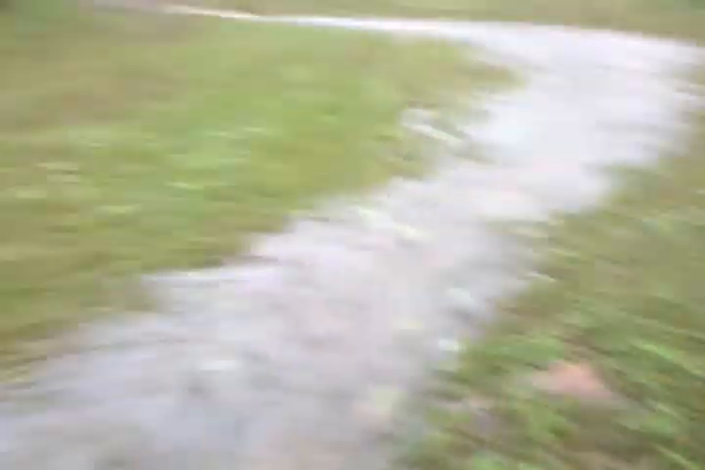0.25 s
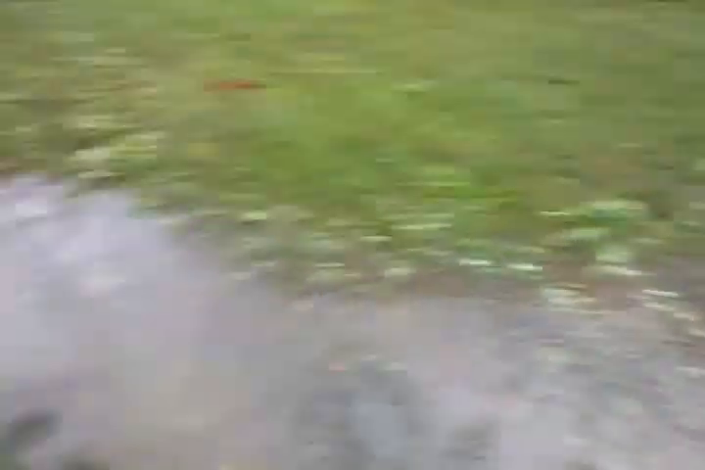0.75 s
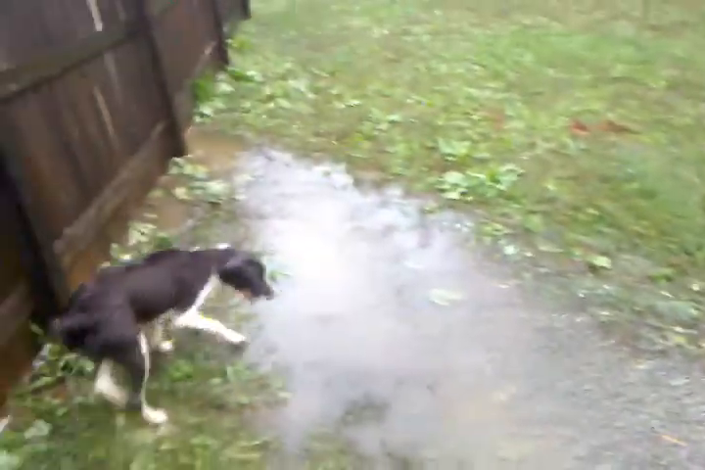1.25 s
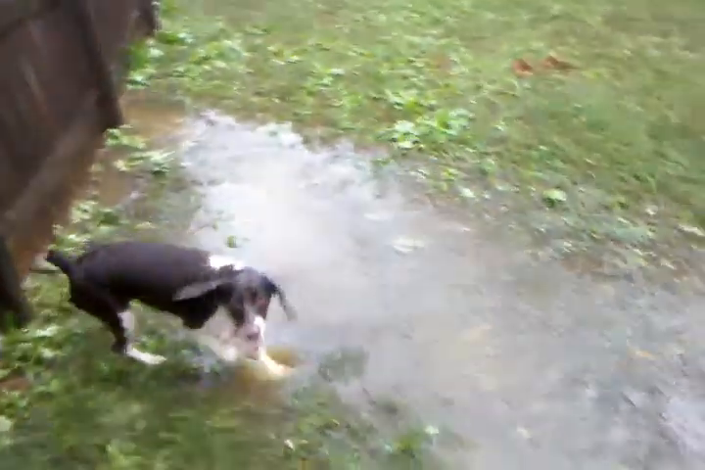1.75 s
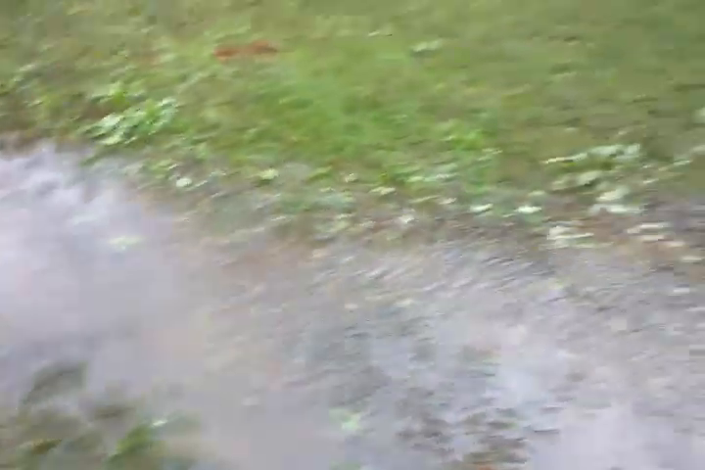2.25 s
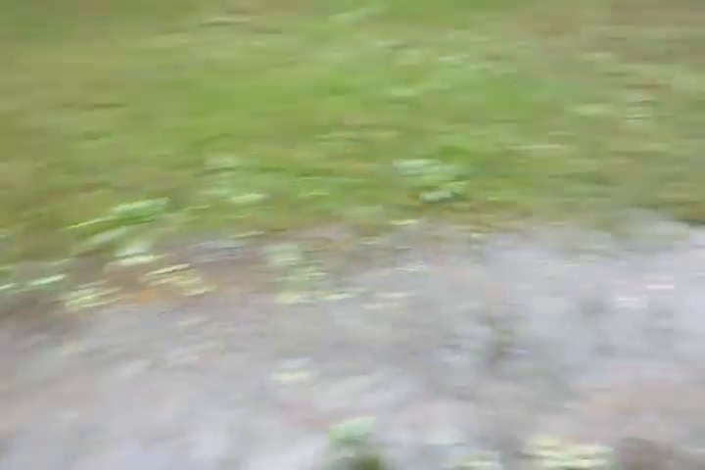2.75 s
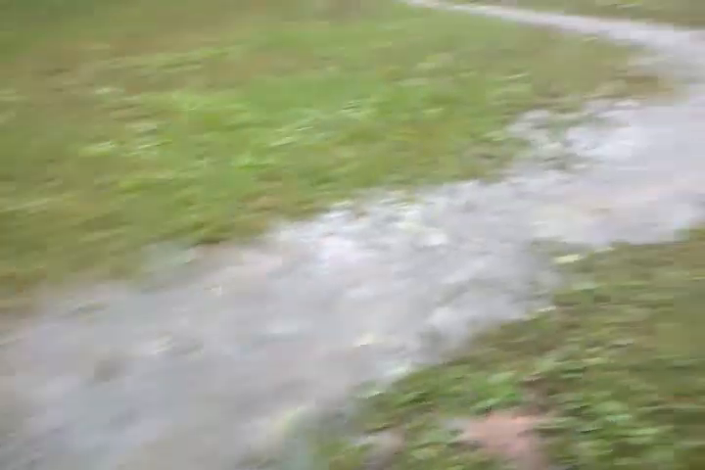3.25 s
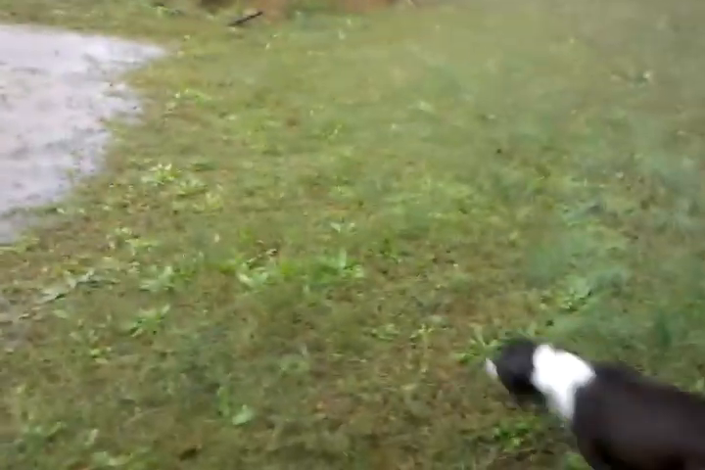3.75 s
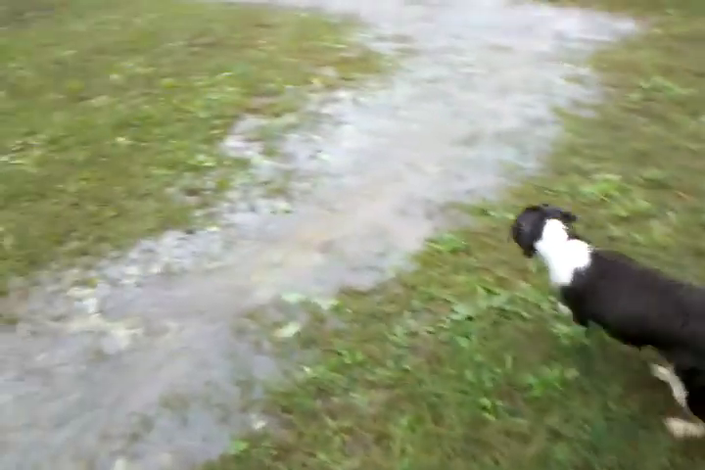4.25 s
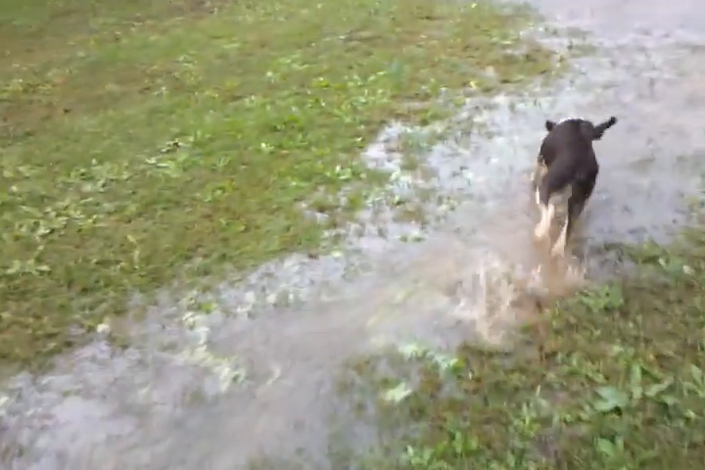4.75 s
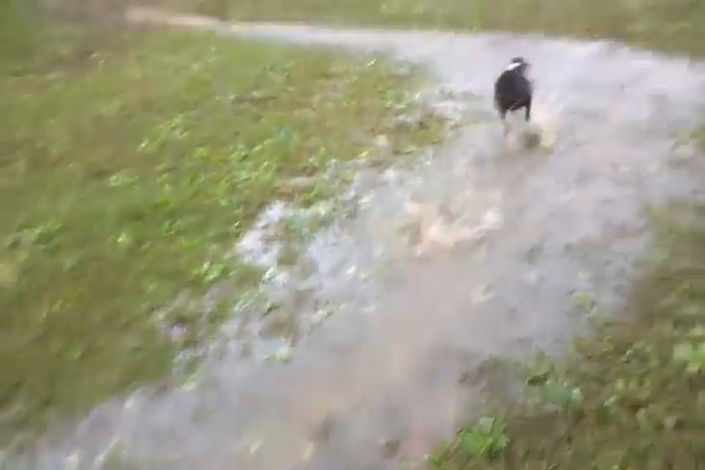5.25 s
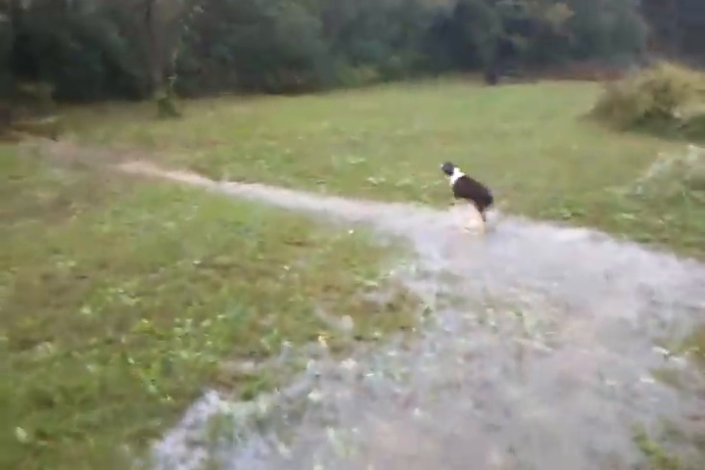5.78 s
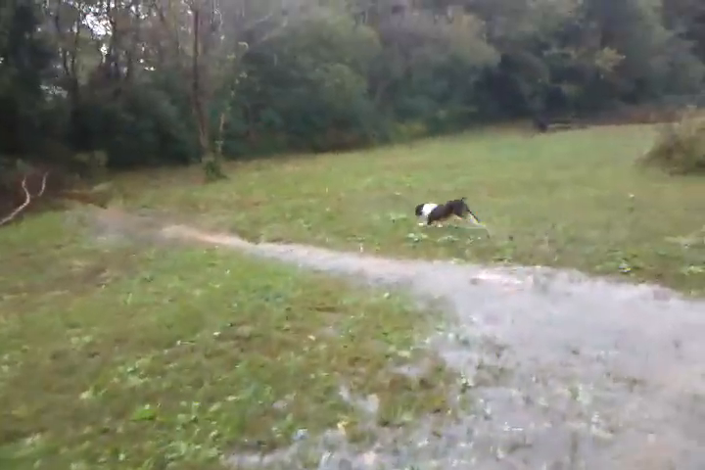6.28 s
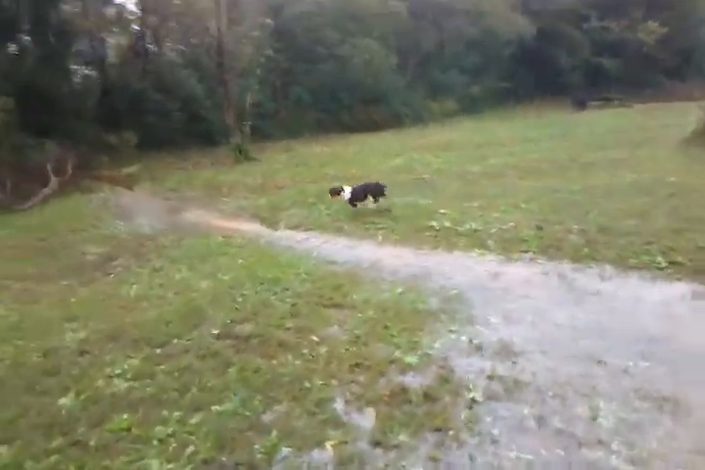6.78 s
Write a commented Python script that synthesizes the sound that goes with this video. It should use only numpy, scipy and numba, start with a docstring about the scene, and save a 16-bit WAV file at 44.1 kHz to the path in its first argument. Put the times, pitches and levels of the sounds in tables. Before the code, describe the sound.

Paws squelch and splash across a flooded lawn, loudest through a long puddle, with close drips and light steady rain.

```python
"""Dog splashing through rain

A dog crosses a flooded lawn, then runs off through a long puddle. Each step squeezes water out
of the turf as fine spray, small bubbles and deep gurgles; hard footfalls trap a ringing air pocket.
Single drops burst near the two ports of a hand-held phone, over rain hiss and a low outdoor rumble."""
import sys
import numpy as np
from scipy import signal
from scipy.fft import rfft, irfft
from scipy.io import wavfile
from scipy.ndimage import uniform_filter1d
from numba import njit

SR = 44100
rng = np.random.default_rng(int(sys.argv[2]) if len(sys.argv) > 2 else 0)


def wrap_up_sound(samples):
    """Save the sound to the file named by the first command line argument, as 16-bit audio."""
    columns = np.atleast_2d(samples).T
    # keep every value between -1 and 1, then stretch to whole-number steps
    tamed = np.clip(columns, -1, 1)
    steps = np.round(tamed * 32767).astype(np.int16)
    wavfile.write(sys.argv[1], SR, steps)


N = 309558
TIME = np.arange(N) / SR


def undb(db):
    """Decibels to gain."""
    return 10 ** (np.asarray(db) / 20)


def unit(x):
    """Scale to rms 1."""
    return x / np.sqrt(np.mean(x ** 2))


def colour(x, spectrum, size=4096):
    """Minimum-phase filter through (freq_hz, gain_db) points; attacks stay sharp."""
    hz, db = np.transpose(spectrum)
    grid_hz = np.arange(size // 2 + 1) * SR / size
    gain = undb(np.interp(np.log(grid_hz + 1), np.log(hz), db))
    cepstrum = irfft(np.log(gain))
    cepstrum[1:size // 2] *= 2
    cepstrum[size // 2 + 1:] = 0
    impulse = irfft(np.exp(rfft(cepstrum)))
    return signal.fftconvolve(x, impulse[None], axes=1)[:, :x.shape[1]]


def resonate(x, hz, q):
    """One resonance, scaled to rms 1."""
    return unit(signal.lfilter(*signal.iirpeak(min(hz, .4 * SR), q, fs=SR), x))


def pan(left_minus_right_db):
    """Constant-power left and right gains."""
    return unit(undb(np.array([[left_minus_right_db], [-left_minus_right_db]]) / 2))


def add(out, start_s, sound):
    """Mix a sound in at start_s."""
    i = max(int(start_s * SR), 0)
    out[:, i:i + sound.shape[1]] += sound[:, :N - i]


@njit
def ring_bubbles(start_s, hz, cycles, gain, glide):
    """Damped sines; each rises in pitch as its bubble nears the surface."""
    out = np.zeros(N)
    for k in range(len(start_s)):
        life_s = cycles[k] / hz[k]
        first = max(int(start_s[k] * SR) + 1, 0)
        end = min(int((start_s[k] + life_s) * SR), N)
        for i in range(first, end):
            t = i / SR - start_s[k]
            phase = 2 * np.pi * hz[k] * t * (1 + glide * t / life_s / 2)
            out[i] += gain[k] * np.exp(-5.5 * t / life_s) * np.sin(phase)
    return out


def bubble_cloud(per_s, low_hz, high_hz, cycles, scatter_db, glide, lag_ms=0.047, spread_ms=0.079):
    """Bubbles of random size and level; each reaches the two ports from its own direction."""
    when, pitch, life, luck, place, lean = rng.random((int(per_s * N / SR), 6)).T
    hz = low_hz * (high_hz / low_hz) ** pitch
    gain = undb(-scatter_db * np.log(np.maximum(luck, .02))) * np.sqrt(hz)
    lag_s = (lag_ms + spread_ms * np.sqrt(3) * (2 * place - 1)) / 1000
    pan_db = 5.0 * (2 * lean - 1)
    return np.array([
        ring_bubbles(when * N / SR + side * lag_s, hz, cycles * (.5 + life),
                     gain * undb(side * pan_db), glide)
        for side in (.5, -.5)])


# Direction of the splashing: time_s, left_minus_right_db
SPLASH_BEARING = [(0, -14), (.54, -7.5), (.7, 3.5), (1.7, 2.5), (2.4, -1.5), (2.66, 5), (3.1, -7.5),
                  (3.35, -4), (3.5, -5.5), (4.05, -5), (4.5, -2), (5.3, -4.5), (6.1, -6.5), (7.02, -5.5)]


def bearing_db(time_s):
    """The splashing shifts sideways as the phone swings after the dog."""
    return np.interp(time_s, *np.transpose(SPLASH_BEARING))


# Open-air spectrum: freq_hz, gain_db
RUMBLE_SPECTRUM = [(20, -25), (42, -40), (60, -10.5), (85, -2.5), (120, 2), (190, 1), (280, -4.5),
                   (420, -9.5), (700, -13.5), (1500, -42.5)]


def rumble(level_db=-56.5, stereo_share=0.27, pan_db=1.6):
    """Low murmur of the open air, nearly the same at both ports."""
    noise = rng.standard_normal((3, N))
    murmur = colour(noise[2] + stereo_share * noise[:2], RUMBLE_SPECTRUM)
    return unit(murmur) * undb(level_db) * pan(pan_db)


# Rain spectrum: freq_hz, gain_db
RAIN_SPECTRUM = [(200, -19), (500, -4.5), (900, -2.5), (1600, -5), (3000, -2), (5000, 1), (8000, -0.5),
                 (10000, -4), (14000, -6)]
# Lift of the rain by water dripping and draining all around: time_s, gain_db
DRIP_LIFT = [(0, 8.5), (.42, 10.5), (.72, 6), (1.3, 7.5), (1.62, 5), (2.5, 9), (2.8, 6.5), (3.3, 7),
             (4.1, 10), (4.37, 5), (5.0, 12), (5.42, 7.5), (6.05, 14), (6.37, 5.5), (6.65, 3.5), (7.02, 2)]


def rain(hiss_db=-58.0, patter_db=-66.5, bearing_share=.25):
    """Far drops merge into a hiss; nearer ones tick on grass and puddles."""
    hiss = colour(rng.standard_normal((2, N)), RAIN_SPECTRUM)
    ticks = bubble_cloud(per_s=600, low_hz=680, high_hz=13800, cycles=2, scatter_db=4.5, glide=.1)
    patter = colour(ticks, RAIN_SPECTRUM)
    steady = unit(hiss) * undb(hiss_db) + unit(patter) * undb(patter_db)
    lift_db = np.interp(TIME, *np.transpose(DRIP_LIFT))
    pan_db = bearing_share * bearing_db(TIME)
    return steady * undb(lift_db + np.array([pan_db, -pan_db]) / 2)


# Drop burst spectrum: freq_hz, gain_db
DROP_SPECTRUM = [(200, -49), (1000, 0.5), (2000, -4), (3500, 2), (5000, 12), (8000, 7.5), (11000, 4.5),
                 (14000, 0)]
# Drops bursting close by: start_s, level_db, decay_s, ring_hz
NEAR_DROPS = [(0.6515, -25, 0.0034, 6400), (0.834, -35.5, 0.0058, 5300), (0.969, -36, .005, 6660),
              (1.6945, -32.5, 0.006, 7800), (1.701, -31, 0.0065, 7850), (1.809, -37, 0.0022, 3430),
              (2.303, -32.5, 0.0077, 6530), (2.63, -29.5, .007, 5600), (3.185, -31, 0.01, 5700),
              (3.48, -26.5, 0.009, 6750), (3.528, -22, .004, 11200), (3.7074, -31, 0.0094, 6900),
              (3.95, -26, 0.0076, 6100), (4.005, -31, 0.0062, 7600), (4.264, -22.5, .007, 7450),
              (4.3378, -26.5, 0.0056, 6640), (4.409, -23.5, 0.0018, 6030), (4.4273, -21.5, 0.0045, 4370),
              (4.502, -26.5, .005, 5500), (4.591, -25, 0.0056, 8250), (4.767, -23.5, 0.0044, 8360),
              (5.6265, -21, 0.0044, 4780), (6.875, -34.5, 0.0061, 7760)]


def near_drops(trim_db=-0.13, attack_s=0.00099, patter_db=-8.5, patter_s=0.0088,
               ring_share=0.46, mono_share=0.38):
    """A near drop shatters for a few milliseconds, then its droplets patter down."""
    out, t = np.zeros((2, N)), TIME[:SR // 20]
    attack = 1 - np.exp(-t / attack_s)
    patter = undb(patter_db) * np.exp(-t / patter_s)
    for start_s, level_db, decay_s, ring_hz in NEAR_DROPS:
        envelope = attack * np.maximum(np.exp(-(t / decay_s) ** 1.15), patter)
        noise = rng.standard_normal((3, len(t)))
        burst = unit(colour(noise[:2] + mono_share * noise[2], DROP_SPECTRUM))
        burst = unit(burst + ring_share * resonate(burst, ring_hz, q=6.5))
        add(out, start_s, burst * envelope * pan(bearing_db(start_s)) * undb(level_db + trim_db))
    return out


# Air pockets shut by a footfall: start_s, level_db, pitch_hz
AIR_POCKETS = [(0.203, -33.5, 1340), (0.601, -46, 1680), (0.835, -34, 1760), (0.853, -47, 950),
               (0.925, -37.5, 925), (1.16, -38, 563), (1.433, -35.5, 1830), (1.699, -34, 1700),
               (1.703, -32.5, 1266), (1.726, -45, 855), (1.927, -35, 1290), (2.034, -37.5, 1210),
               (2.066, -40, 2270), (2.382, -31, 910), (2.737, -41, 574), (3.363, -36, 1830),
               (3.481, -39, 960), (4.602, -28, 2210), (4.9045, -13, 2160), (4.975, -23, 579),
               (5.32, -36.5, 560), (5.126, -27, 710), (5.676, -24, 665), (5.8, -27, 565), (6.095, -38, 620),
               (6.718, -41, 676), (6.939, -31.5, 1280)]


def plops(trim_db=-2.5, glide_per_s=3.6, slap_share=0.4, slap_s=0.0037):
    """A paw slaps the surface; the air under it rings briefly, rising in pitch."""
    out, t = np.zeros((2, N)), TIME[:SR // 20]
    for start_s, level_db, pitch_hz in AIR_POCKETS:
        ring_s = np.interp(level_db, [-32, -16], [.005, .0017])  # hard blows tear it open sooner
        pocket = np.exp(-t / ring_s) * np.sin(2 * np.pi * pitch_hz * t * (1 + glide_per_s * t / 2))
        band = signal.butter(2, [420, min(pitch_hz * 2, 3200)], "band", fs=SR, output="sos")
        slap = unit(signal.sosfilt(band, rng.standard_normal((2, len(t))))) * np.exp(-t / slap_s)
        attack = 1 - np.exp(-t * pitch_hz)
        add(out, start_s, undb(level_db + trim_db) * (pocket + slap_share * slap) * attack)
    return out


def slosh_envelope(trim_db=-16.5, db_per_octave=-11, large_pocket_hz=600, attack_s=0.0021, decay_s=0.031):
    """Water closes over each air pocket, less over a small one."""
    out, t = np.zeros((1, N)), TIME[:SR // 3]
    envelope = np.exp(-t / decay_s) * (1 - np.exp(-t / attack_s))
    for start_s, level_db, pitch_hz in AIR_POCKETS:
        size_db = db_per_octave * np.log2(pitch_hz / large_pocket_hz)
        add(out, start_s, undb(level_db + trim_db + size_db) * envelope[None])
    return out


# Large-bubble spectrum: freq_hz, gain_db
GURGLE_SPECTRUM = [(120, -23.5), (250, -1), (430, -9), (610, 0), (850, -0.5), (1100, 0.5), (1400, 3),
                   (2500, -12.5)]


def gurgle_cloud():
    """Large bubbles ring low."""
    cloud = bubble_cloud(per_s=800, low_hz=324, high_hz=1308, cycles=10.4, scatter_db=3.0,
                         glide=0.11, spread_ms=0.11)
    return colour(cloud, GURGLE_SPECTRUM)


# Small-bubble spectrum: freq_hz, gain_db
CHURN_SPECTRUM = [(500, -14.5), (850, -8), (1150, -3), (1650, -4.5), (2300, -1.5), (3000, 3), (4200, 7),
                  (7000, -45)]


def churn_cloud():
    """Small bubbles ring in the midrange, most faint, a few loud."""
    cloud = bubble_cloud(per_s=1900, low_hz=900, high_hz=4400, cycles=22, scatter_db=3.4, glide=.05)
    return colour(cloud, CHURN_SPECTRUM)


# Spray spectrum: freq_hz, gain_db
SPRAY_SPECTRUM = [(1500, -17), (2800, -5), (4000, -1), (6000, 1), (8100, -4), (9500, -0.5), (11500, -1.5),
                  (14000, 1.5)]


def spray_cloud(droplets_db=-9.5):
    """Dense mist of tiny ticks, with longer-ringing droplets."""
    mist = bubble_cloud(per_s=9000, low_hz=2980, high_hz=14800, cycles=2.9, scatter_db=-0.5, glide=0.055)
    droplets = bubble_cloud(per_s=1200, low_hz=2940, high_hz=9950, cycles=100, scatter_db=1.0, glide=.02)
    return colour(unit(mist) + unit(droplets) * undb(droplets_db), SPRAY_SPECTRUM)


def spurts(rate_hz=150, spread_db=1.5):
    """Random gain: water leaves the turf unevenly."""
    hold = int(SR / rate_hz)
    levels = np.repeat(rng.standard_normal(N // hold + 1), hold)
    wander = np.sqrt(2) * uniform_filter1d(uniform_filter1d(levels, hold), hold)[:N]
    return undb(spread_db * wander)


def stroke_envelope(t, half_s, fallback_s, fallback_db=-14.5):
    """Water swells and drains around t = 0; what was thrown up patters back."""
    width_s = half_s * np.where(t < 0, 0.94, 1.06)
    swell = np.exp(-np.abs(t / width_s) ** 1.8)
    fallback = (t > 0) * undb(fallback_db) * np.exp(-np.abs(t) / fallback_s)
    return swell + (1 - swell) * fallback


# Deep water gives more and larger bubbles: churn_minus_spray_db, spray_hz, churn_hz
DEPTH_PITCHES = [(-1, 7540, 2080), (0, 8340, 2430), (5, 5100, 1520)]
# Paw strokes through the water: peak_s, half_length_s, spray_db, churn_db
PAW_STROKES = [(0.127, 0.019, -38, -42), (0.166, 0.013, -41.5, -56), (0.214, 0.015, -48.5, -42),
               (0.268, 0.037, -49.5, -46.5), (0.399, 0.011, -41, -53), (0.538, 0.028, -39.5, -43),
               (0.61, .02, -46.5, -43.5), (0.652, 0.013, -39, -45.5), (0.765, 0.016, -46.5, -54),
               (0.841, 0.015, -44, -40.5), (0.903, 0.029, -63, -49), (0.979, 0.028, -41, -47.5),
               (1.07, 0.017, -36.5, -40.5), (1.212, 0.014, -44.5, -54), (1.32, 0.013, -47.5, -58),
               (1.438, 0.0094, -42, -38.5), (1.478, 0.042, -47.5, -46), (1.534, 0.014, -44.5, -60),
               (1.697, 0.0047, -42, -39.5), (1.728, 0.012, -45.5, -54), (1.818, 0.058, -68, -49.5),
               (1.894, .038, -47.5, -53), (1.95, .013, -35, -51), (2.04, 0.031, -51.5, -47.5),
               (2.09, .02, -47.5, -59), (2.174, .052, -46, -54), (2.31, 0.012, -40.5, -53),
               (2.393, 0.039, -42, -42.5), (2.465, 0.018, -42, -50), (2.534, 0.025, -49.5, -52),
               (2.67, 0.021, -47.5, -52.5), (2.96, 0.053, -62, -56), (3.049, 0.054, -45.5, -54.5),
               (3.117, 0.015, -42, -49), (3.275, 0.081, -42, -50), (3.366, 0.013, -43, -38.5),
               (3.456, 0.078, -46.5, -69), (3.628, 0.045, -43.5, -54), (3.727, 0.034, -42, -56),
               (3.876, 0.058, -34.5, -48.5), (4.023, 0.033, -35, -45.5), (4.1, 0.055, -42.5, -46.5),
               (4.22, 0.11, -48, -57.5), (4.439, 0.015, -38.5, -46), (4.516, 0.04, -38, -43.5),
               (4.634, 0.043, -32, -38), (4.805, 0.079, -37.5, -41), (4.907, 0.041, -28, -33.5),
               (4.978, 0.024, -36, -39), (5.064, 0.053, -42.5, -48), (5.157, 0.061, -39.5, -41),
               (5.308, 0.068, -34.5, -40), (5.529, 0.077, -33, -42), (5.676, 0.029, -41.5, -42.5),
               (5.794, 0.044, -34.5, -38.5), (5.916, 0.041, -67, -47.5), (6.081, 0.043, -41.5, -46.5),
               (6.189, 0.046, -38, -49.5), (6.233, 0.017, -33.5, -44.5), (6.296, 0.023, -48, -50),
               (6.598, 0.038, -51.5, -54.5), (6.75, 0.054, -55, -56), (6.904, 0.027, -38.5, -47),
               (6.948, 0.024, -34, -41), (6.992, 0.018, -37, -44.5)]


def paw_steps(spray_trim_db=0.3, churn_trim_db=-2.0, gurgle_vs_churn_db=-9.5,
              gurgle_lag_s=0.0083, fallback_s=0.035):
    """Each stroke stirs three sizes of bubble; the gurgle also sloshes over the air pockets."""
    clouds = spray_cloud(), churn_cloud(), gurgle_cloud()
    spray, churn, gurgle = (cloud * spurts() for cloud in clouds)
    depths_db, *pitches_hz = np.transpose(DEPTH_PITCHES)
    out = unit(gurgle) * slosh_envelope()
    for peak_s, half_s, spray_db, churn_db in PAW_STROKES:
        start_s, end_s = peak_s - 3 * half_s, peak_s + 3 * max(half_s, fallback_s)
        span = slice(max(int(start_s * SR), 0), int(end_s * SR))
        t = TIME[span] - peak_s
        spray_hz, churn_hz = (np.interp(churn_db - spray_db, depths_db, hz) for hz in pitches_hz)
        sizzle = .45 * resonate(spray[:, span], spray_hz, q=7)  # a sharp ring on each stroke's spray pitch
        fizz = unit(resonate(spray[:, span], spray_hz, q=0.98) + sizzle)
        # the phone shades only short waves from its far port
        splash = fizz * undb(spray_db + spray_trim_db) * pan(bearing_db(peak_s))
        churn_gain = undb(churn_db + churn_trim_db)
        bubbles = churn_gain * resonate(churn[:, span], churn_hz, q=1.19)
        out[:, span] += stroke_envelope(t, half_s, fallback_s) * (splash + bubbles)
        # large bubbles form late and linger, so a short stroke stirs few
        slow_s = half_s + gurgle_lag_s
        gurgle_gain = churn_gain * undb(gurgle_vs_churn_db) * half_s / slow_s
        late_swell = stroke_envelope(t - gurgle_lag_s / 2, slow_s, fallback_s)
        out[:, span] += late_swell * gurgle_gain * unit(gurgle[:, span])
    return out


# Top-octave level, crisp with the dog near and ahead, dull as it runs off: time_s, gain_db
TREBLE_LEVEL = [(0, 1.5), (.4, -5), (.85, 2), (1.35, 3.5), (1.95, 4.5), (2.5, -0.5), (3, 0), (4.9, 1),
                (5.8, -2), (6.7, -4.5)]


def treble_shading(x, edge_hz=10700.0):
    """Distance and direction lift or dull the shortest waves."""
    treble = signal.sosfiltfilt(signal.butter(3, edge_hz, "high", fs=SR, output="sos"), x)
    gain = undb(np.interp(TIME, *np.transpose(TREBLE_LEVEL)))
    return x + treble * (gain - 1)


def scene():
    """Steps, plops, near drops and rain over the outdoor rumble."""
    return treble_shading(paw_steps() + plops() + near_drops() + rain()) + rumble()


def record(dry, port_hz=8240.0, port_q=7.3, port_gain=0.37, cutoff_hz=14000):
    """The cavities behind the phone's ports ring a little; the top is cut steeply."""
    port_ring = signal.lfilter(*signal.iirpeak(port_hz, port_q, fs=SR), dry)
    lowpass = signal.ellip(12, .2, 80, cutoff_hz, fs=SR, output="sos")
    return signal.sosfilt(lowpass, dry + port_gain * port_ring)


dry = scene()
out = record(dry)
wrap_up_sound(out)
```